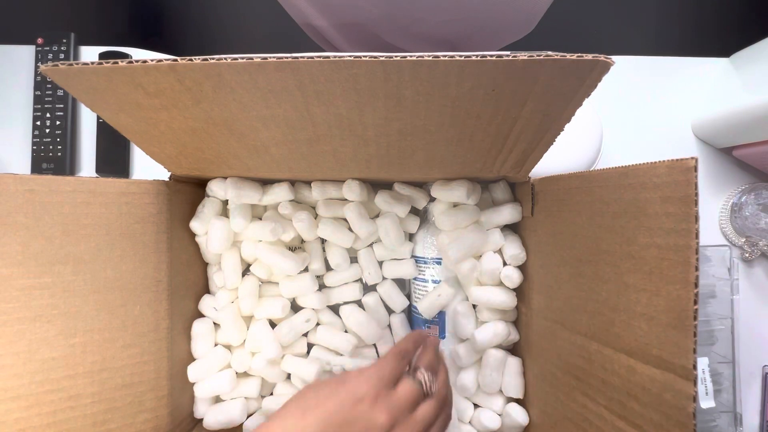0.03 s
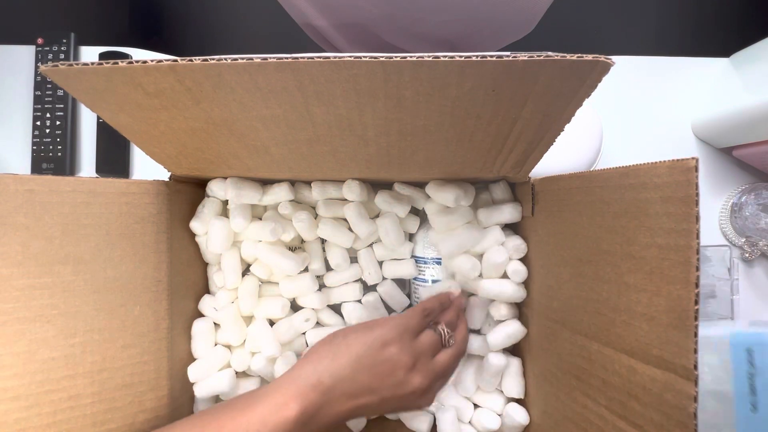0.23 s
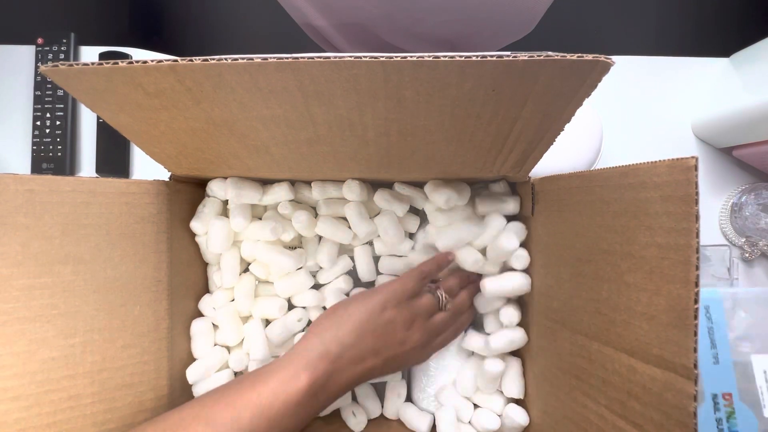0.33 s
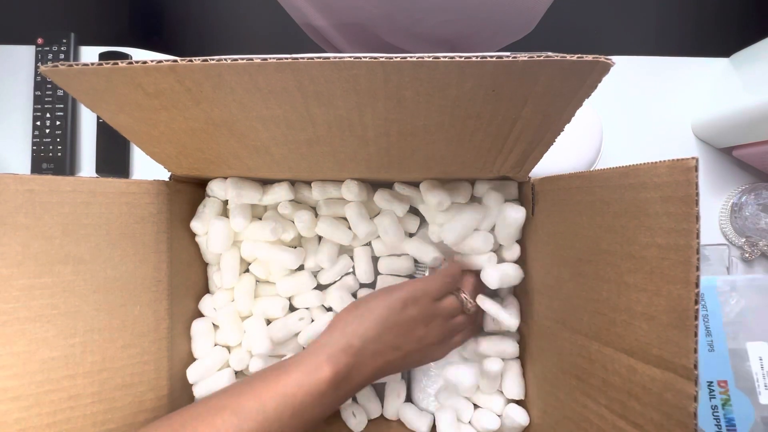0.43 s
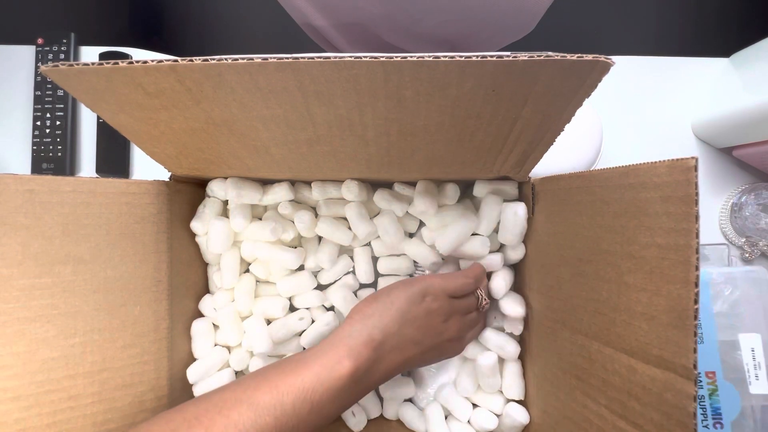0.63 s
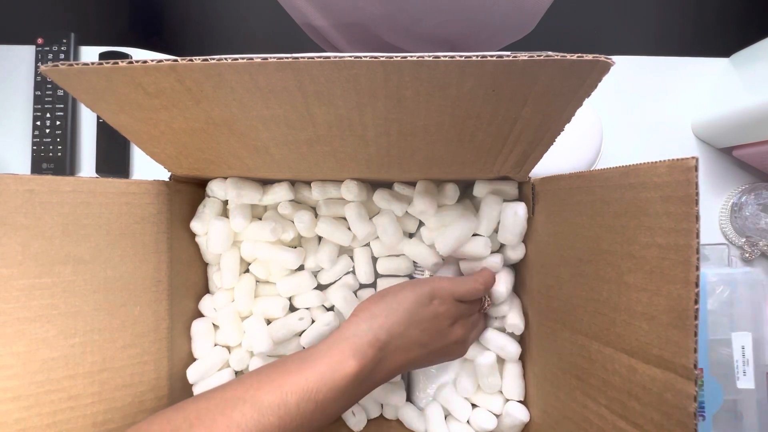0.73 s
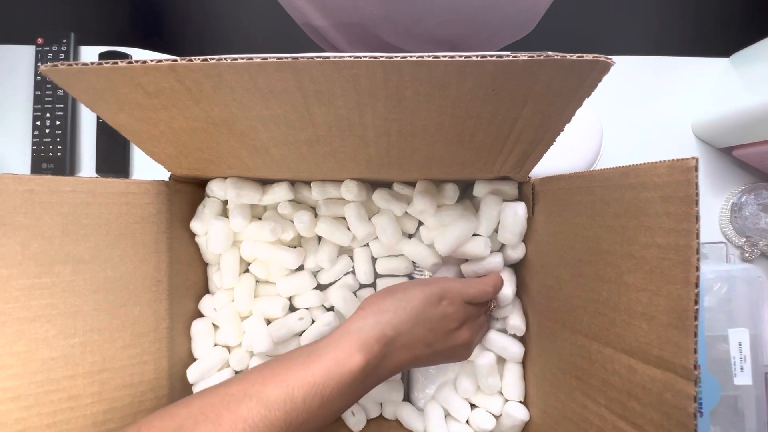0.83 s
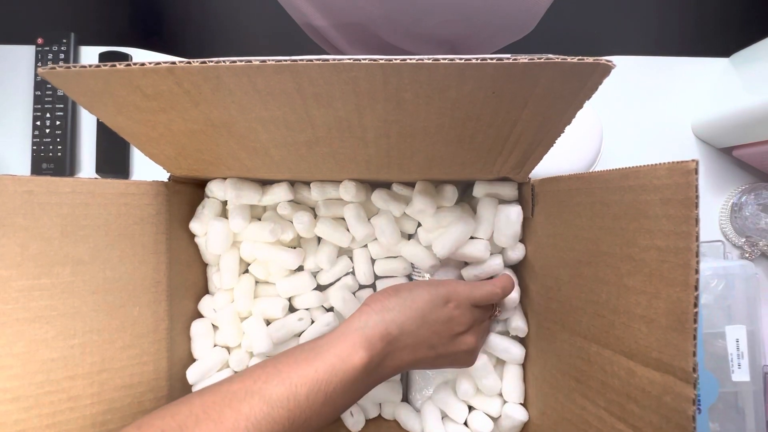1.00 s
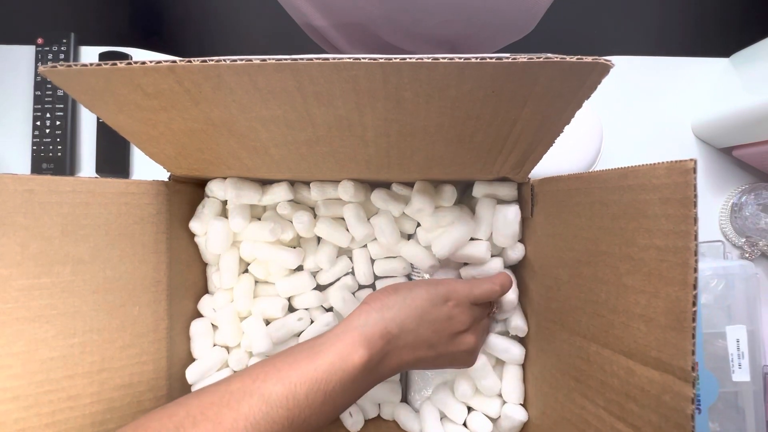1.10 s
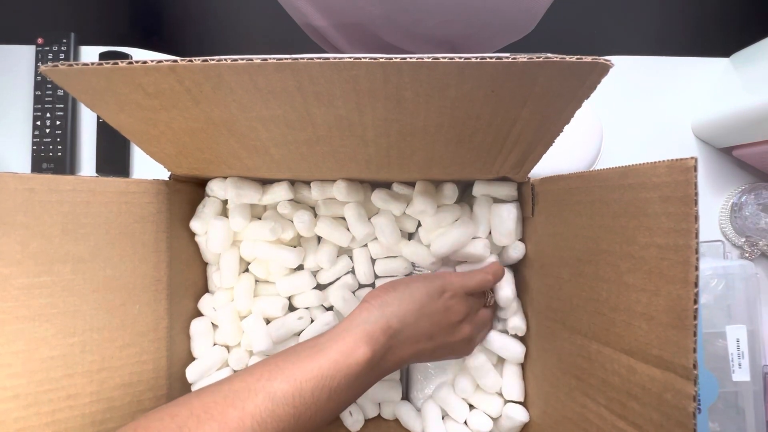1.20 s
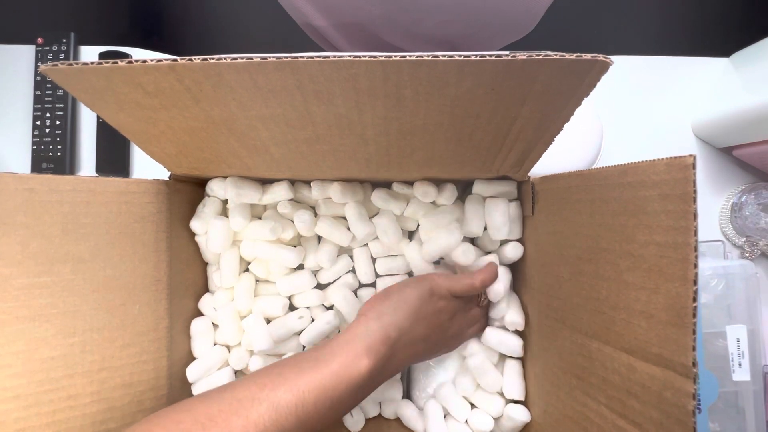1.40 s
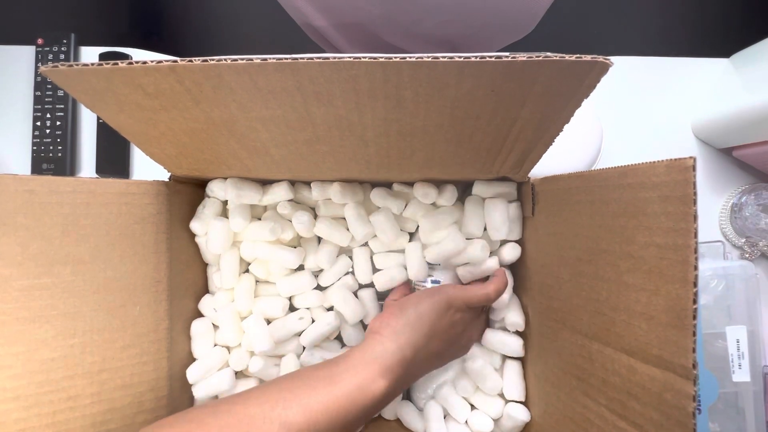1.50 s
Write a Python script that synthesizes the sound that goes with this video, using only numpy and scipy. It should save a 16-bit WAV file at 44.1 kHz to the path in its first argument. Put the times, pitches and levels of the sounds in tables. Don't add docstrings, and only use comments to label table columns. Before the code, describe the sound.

Foam packing pieces are stirred in a cardboard box, close and dry: fine clumped rustling with brief crisp snaps. At about 0.33 s a buried bottle hits the carton, by far the loudest knock, with a short rattle and low table thumps. Lighter knocks and a rustle surge come around 0.75 s, taps continue to 1.2 s, then sparse rubbing and a small knock near 1.5 s. Faint room hum.

```python
import sys
import numpy as np
from scipy import signal
from scipy.fft import rfft, irfft, next_fast_len
from scipy.io import wavfile
from scipy.ndimage import uniform_filter1d, minimum_filter1d

SR = 44100
rng = np.random.default_rng(int(sys.argv[2]) if len(sys.argv) > 2 else 0)


def invert_db(x):
    u = np.asarray(x, float) / 20
    return 10 ** u


def store_wav(level_fs):
    pcm = np.round(np.clip(np.atleast_2d(level_fs), -1, 1) * 32767)
    wavfile.write(sys.argv[1], SR, pcm.T.astype(np.int16))


N = 68355

# pitch_hz, level_db [dB per Hz]
BED_TONE = [(100, -14), (200, -5.5), (400, -1), (900, -1), (1800, -4.5), (3500, -20)]


def in_time(rows):
    s, *columns = np.transpose(rows)
    return [np.interp(np.arange(N) / SR, s, c) for c in columns]


def rms_one(x):
    return x / np.sqrt(np.mean(x ** 2) + 1e-20)


def peak_one(x):
    return x / np.abs(x).max(axis=1, keepdims=True)


def colour(x, points):
    hz, db = np.transpose(points)
    log_hz = np.log(np.fft.rfftfreq(N, 1 / SR) + 1)
    gain = invert_db(np.interp(log_hz, np.log(hz), db, left=-60))
    return rms_one(irfft(rfft(x) * gain, N))


def highpass(x, order, hz):
    return signal.sosfilt(signal.butter(order, hz, "high", fs=SR, output="sos"), x)


def drift(rate_hz):
    r = np.exp(-2 * np.pi * rate_hz / SR)
    noise = rng.standard_normal(N + SR)
    return rms_one(signal.lfilter([1], [1, -2 * r, r * r], noise)[SR:])


def ring(push, hz, t60):
    r, w = invert_db(-60 / (t60 * SR)), 2 * np.pi * hz / SR
    return signal.lfilter([0, np.sin(w)], [1, -2 * r * np.cos(w), r * r], push + 1e-18)


def grain_gate(per_s, spread_db, t60):
    sizes = invert_db(spread_db * np.minimum(rng.exponential(1, N), 4))
    touches = sizes * (rng.random(N) < per_s / SR)
    return rms_one(signal.lfilter([1], [1, -invert_db(-60 / (t60 * SR))], touches))


def add(out, s, sound):
    i = int(s * SR)
    out[:, i:i + sound.shape[1]] += sound[:, :N - i]


def rumble():
    tone = [(20, -30), (50, -6), (78, 0), (130, -3), (200, -16)]
    return invert_db(-54) * colour(rng.standard_normal((2, N)), tone)


def thumps():
    # start_s [s], level_db [peak dB], pitch_hz [Hz]
    rocks = [(0.152, -45, 63), (0.233, -46, 78.5), (0.278, -38.5, 65), (0.324, -40, 75.4),
             (0.351, -37, 67.5), (0.411, -47, 100), (0.468, -53, 94), (.735, -50, 88), (.83, -48, 86),
             (1.2, -50, 106), (1.26, -48, 86), (1.332, -42, 71), (1.461, -53, 87)]
    swell_s = 0.019
    out, t = np.zeros((2, N)), np.arange(int(.3 * SR)) / SR
    swell = (t / swell_s * np.exp(1 - t / swell_s)) ** 2
    turns = rng.uniform(0, 2 * np.pi, (len(rocks), 2, 1))
    for (s, db, hz), turn in zip(rocks, turns):
        add(out, s, invert_db(db) * swell * np.sin(2 * np.pi * hz * t + turn))
    return out


def knocks():
    # start_s [s], level_db [peak dB],
    # pitch_hz [Hz], side_db [dB], rattle_db [dB]
    hits = [(0.087, -41, 390, -7.5, -9.5), (0.3327, -5.5, 730, -7.5, -14.5), (.362, -21, 830, -18, -9.5),
            (.411, -45, 1160, -8, -12), (0.617, -27.5, 1510, -3, -22), (0.74, -18, 435, -9.5, -18.5),
            (.752, -26, 690, 5, -17), (0.9085, -27, 1480, -8, -21.5), (1.0942, -29.5, 937, -7, -16.5),
            (1.154, -38, 595, -10, -9.5), (1.1837, -29.5, 896, 6, -15), (1.335, -40, 394, -1, -16),
            (1.491, -25.5, 1350, 0, -19), (1.498, -35.5, 317, -12, -32), (.149, -35, 1500, -3, -18),
            (0.2013, -31.5, 1860, -9, -16), (0.3371, -15, 440, -9, -15.5), (.701, -29, 850, -3, -21),
            (.7655, -30.5, 1400, -10, -18), (.85, -25.5, 2600, -4, -26.5), (.878, -31, 912, -10, -17),
            (.894, -32, 915, -6, -36), (0.9343, -41, 890, -10, -15.5), (.958, -32.5, 1470, -11, -23),
            (1.453, -35, 496, 0.5, -15)]
    side_ratios = [0.617, 1.3, 1.977, 2.91]
    # pitch_hz [Hz], level_db [dB], t60_s [s to fall 60 dB]
    walls = [(261, -3.5, 0.017), (404, 0, 0.034), (801, -1, 0.033), (713, -1.5, 0.047), (850, -0.5, 0.021),
             (1025, 0.5, 0.036), (1503, 1.5, 0.013), (2025, -5.5, 0.017), (2632, -4.5, 0.012)]
    cycles, rattle_t60_s = 2.06, 0.35
    take_db = np.array([[2.1], [-4]])
    out, rattle, t = np.zeros((2, N)), np.zeros((1, N)), np.arange(int(.4 * SR))[None] / SR
    turns = rng.uniform(0, 2 * np.pi, (len(hits), len(side_ratios) + 1, 2, 1))
    turns[:, 0, 0] = 0
    for (s, db, hz, side_db, rattle_db), turn in zip(hits, turns):
        age = t * hz / cycles
        swell = age ** 0.57 * np.exp(-age ** 1.36)
        sides = sum(np.sin(2 * np.pi * hz * ratio * t + a) / ratio ** 0.35
                    for ratio, a in zip(side_ratios, turn[1:]))
        tone = (np.sin(2 * np.pi * hz * t + turn[0]) + invert_db(side_db) * sides) * swell
        add(out, s, invert_db(db + take_db) * peak_one(highpass(tone, 4, hz * .45)))
        rattle_rise = 1 - np.exp(-(t / 0.0032) ** 2)
        add(rattle, s, invert_db(db + rattle_db - 60 * t / rattle_t60_s) * rattle_rise)
    gate = 0.79 + grain_gate(1000, 1.4, 0.011)
    body = sum(invert_db(db) * rms_one(ring(gate * rng.standard_normal((2, N)), hz, t60))
               for hz, db, t60 in walls)
    loose = colour(gate * rng.standard_normal((2, N)), BED_TONE)
    return out + rattle * (invert_db(-10) * body + 0.56 * loose)


def snaps():
    # start_s [s], level_db [peak dB], pitch_hz [Hz], length_s
    # [s], crack_db [dB]
    slips = [(0.022, -27.5, 6140, 0.00083, 0), (0.0354, -32, 5900, 0.0012, -5),
             (0.0608, -25.5, 7500, 0.0019, -8), (0.086, -21, 8000, 0.0006, 1),
             (0.1334, -27.5, 6000, 0.00071, -9), (0.1483, -18.5, 6250, 0.00041, -2.5),
             (0.2026, -18.5, 4470, 0.00045, 5), (0.3338, -11.5, 4470, 0.0011, -5),
             (0.41, -26, 2570, 0.0017, -1.5), (0.461, -27, 6700, 0.0013, -5),
             (0.483, -22.5, 6000, 0.00059, -2), (0.5292, -22.5, 5850, 0.0011, -2),
             (0.5681, -28.5, 7900, 0.0011, -3.5), (0.617, -27.5, 4370, 0.0014, 0),
             (0.6295, -29, 5600, 0.0015, -7),
             (0.701, -20, 3900, 0.0012, 1), (0.733, -29, 3120, 0.0011, 2), (0.7642, -17, 5800, 0.00035, -7),
            (0.827, -24.5, 1970, 0.00043, -28), (0.85, -21.5, 4560, 0.00083, -9),
            (0.8948, -17.5, 5600, 0.00053, -0.5), (0.909, -24, 2600, 0.0028, -11),
            (0.936, -29, 7220, 0.0014, 2), (0.9585, -24, 5200, 0.00088, 5.5),
            (0.997, -28.5, 5200, 0.00035, 11), (1.075, -31, 9150, 0.0015, -21),
            (1.0945, -35.5, 2780, 0.0006, -24), (1.183, -35, 2030, 0.0011, 4),
            (1.452, -29.5, 4500, 0.00083, -6), (1.4746, -21.5, 9100, 0.00086, -9),
            (1.498, -30.5, 2450, 0.00075, 8)]
    rise_s, tail_s, tail_db = 0.00061, 0.0064, -17.5
    band_ratio, broad_db, click_db = 1.59, -7, 11
    rows = slips
    out, t = np.zeros((2, N)), np.arange(int(.03 * SR)) / SR - .003
    noises = rng.standard_normal((len(rows), 2, len(t)))
    for (s, db, hz, length, crack_db), noise in zip(rows, noises):
        noise = noise + invert_db(click_db) * (np.abs(t) == np.abs(t).min())
        edges = [hz / band_ratio, min(hz * band_ratio, .45 * SR)]
        band = rms_one(signal.sosfilt(signal.butter(2, edges, "band", fs=SR, output="sos"), noise))
        fall = np.exp(-t / max(length, 3e-4)) + invert_db(tail_db) * np.exp(-t / tail_s)
        shape = np.where(t < 0, np.exp(t / rise_s), fall)
        burst = peak_one((band + invert_db(broad_db) * noise) * shape)
        crack = peak_one(highpass(noise, 2, 7500) * shape ** 0.85)
        add(out, s - .002, invert_db(db + 1.5) * (burst + invert_db(crack_db) * crack))
    return out


def rustle():
    # start_s [s], stir_db [dB], push_db [depth into the box, dB], crisp_db [dB]
    hand = [(0, -50, -2.5, -10), (.05, -43.5, -6.5, -9), (.12, -47, 5, 9), (.19, -48, -7, 4),
            (.23, -42, 0, 0), (.32, -41, 4, 7), (.42, -42, -3, -10), (.54, -40.5, -3.5, -0.5),
            (.6, -50, 3, -5), (.67, -45, -3, 7), (.74, -33.5, -1, 1), (.8, -46, 6, -19),
            (.9, -41.5, -8, -5), (1.04, -45.5, 2.5, -4), (1.13, -60, 7.5, -12), (1.23, -41, -2, -0.5),
            (1.4, -58.5, 9.5, -13), (1.55, -48, -3.5, -1)]
    # pitch_hz [Hz], level_db [dB per Hz]
    foam_tone = [(800, -18), (1500, 0.5), (3000, -0.5), (5500, -2), (8000, -4), (11000, -14),
                 (15000, -18.5), (17000, -9)]
    grains_per_s, grain_t60_s, grain_db, flicker_db = 600, 0.0058, -1.5, 2
    stir_db, push_db, crisp_db = in_time(hand)
    noise = rng.standard_normal((3, 2, N))
    clumped_per_s = grains_per_s * invert_db(2.4 * drift(13))
    grains = grain_gate(clumped_per_s, 3.1, grain_t60_s) * noise[0]
    hiss = noise[1] * invert_db(flicker_db * drift(30))
    foam = colour(hiss + invert_db(grain_db) * grains, foam_tone)
    crisp = signal.sosfiltfilt(signal.butter(2, 8700, "high", fs=SR, output="sos"), foam)
    foam = foam + (invert_db(crisp_db) - 1) * crisp
    bed = colour(noise[2] * (0.97 + grain_gate(260, 0.69, 0.03)), BED_TONE)
    return invert_db(stir_db) * (foam + invert_db(push_db - 2) * bed)


def two_ports(sound):
    # pitch_hz [Hz], left_over_right_db [dB], likeness [0-1]
    ports = [(100, -2.5, 0.92), (606, -1.5, 0.37), (1200, -4, 0.42), (2600, -3.5, 0.23), (3870, -7, 0),
             (5500, -16.5, 0.15), (7220, -11, 0), (8400, -2.5, 0.7), (10700, 1, 0.87), (16000, -3, 0.7)]
    # pitch_hz [Hz], lead [radians]
    left_lead = [(0, 0), (860, -2.7), (2070, -2.9), (3620, -7.6), (6200, -2.7), (8610, -6.9), (9730, -3.7),
                 (11000, -2.8), (11800, -0.2), (12800, 0.3), (13400, 3.0), (14400, 3.3), (15200, 6.3),
                 (16700, 6.4)]
    size = next_fast_len(N + 4096)
    direct, scattered = rfft(sound, size)
    hz = np.fft.rfftfreq(size, 1 / SR)
    port_hz, port_db, likeness = np.transpose(ports)
    db = np.interp(hz, port_hz, port_db)
    alike = np.clip(np.interp(hz, port_hz, likeness), 0, 1)
    lead = np.interp(hz, *np.transpose(left_lead))
    blend = alike * direct + np.sqrt(1 - alike ** 2) * scattered
    left = invert_db(db / 2) * np.exp(.5j * lead) * blend
    right = invert_db(-db / 2) * np.exp(-.5j * lead) * direct
    return irfft(np.array([left, right]), size)[:, :N]


def scene():
    return two_ports(rustle() + snaps() + knocks() + thumps() + rumble())


def drop_faint_treble(x):
    # low_hz [Hz], high_hz [Hz]
    cancelled = [(9600, 11200), (13400, 14600)]
    side_hz, top_hz = 14700, 15950
    hz = np.fft.rfftfreq(N, 1 / SR)
    in_bands = sum((hz > low) & (hz < high) for low, high in cancelled)
    middle = irfft(rfft(x.mean(axis=0)) * in_bands, N)
    side = irfft(rfft(x[0] - x[1]) / 2 * (hz > side_hz) * (hz < top_hz), N)
    faint = middle + side * [[1], [-1]] + irfft(rfft(x) * (hz >= top_hz), N)
    bright = np.diff(x[1], 2, prepend=[0, 0]) ** 2
    quick, slow = uniform_filter1d(bright, size=88), uniform_filter1d(bright, size=2000)
    click = quick > invert_db(10) * slow
    near = -minimum_filter1d(-1. * click, size=int(.024 * SR))
    return x - faint * (1 - uniform_filter1d(near, size=256))


def low_pass(x):
    return signal.sosfilt(signal.butter(12, 17140, fs=SR, output="sos"), x)


def record(dry):
    x = highpass(dry, 4, 52)
    x = signal.sosfilt(signal.cheby2(10, 60, 16600 * 1.003, fs=SR, output="sos"), x)
    mix = drop_faint_treble(x)
    return low_pass(mix)


dry = scene()
out = record(dry)
store_wav(out)
```